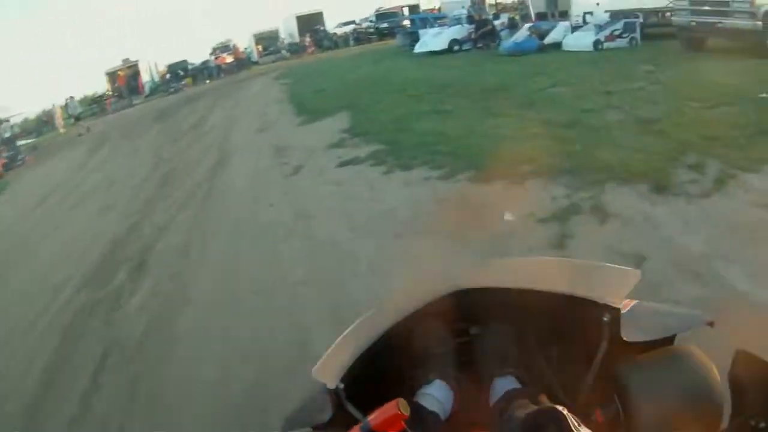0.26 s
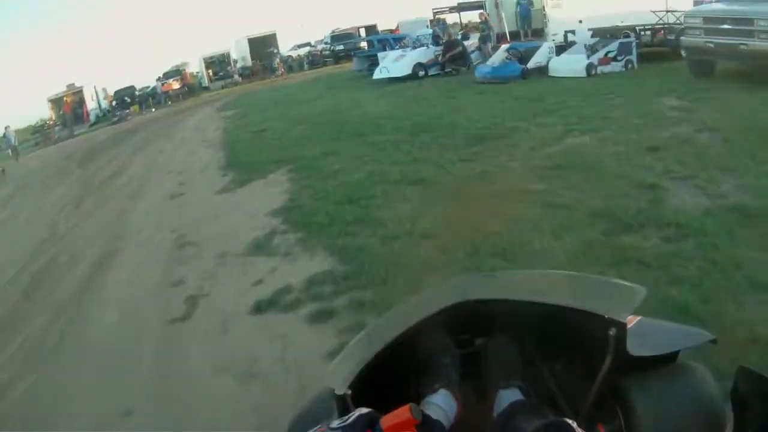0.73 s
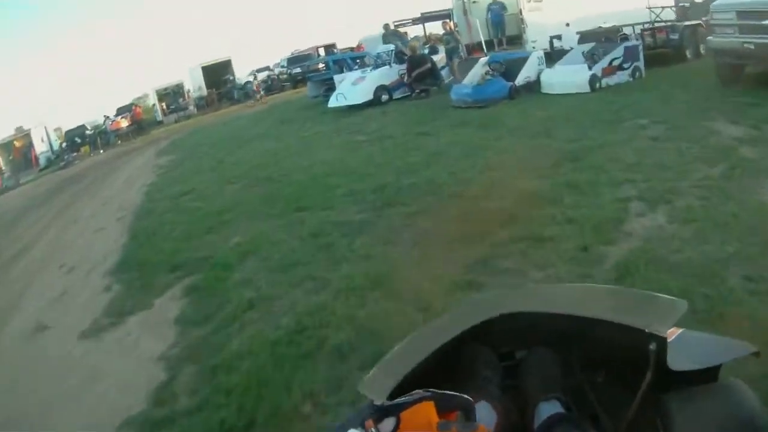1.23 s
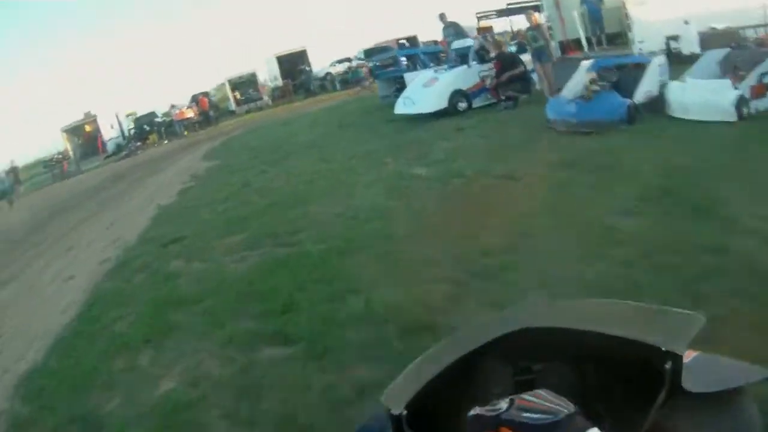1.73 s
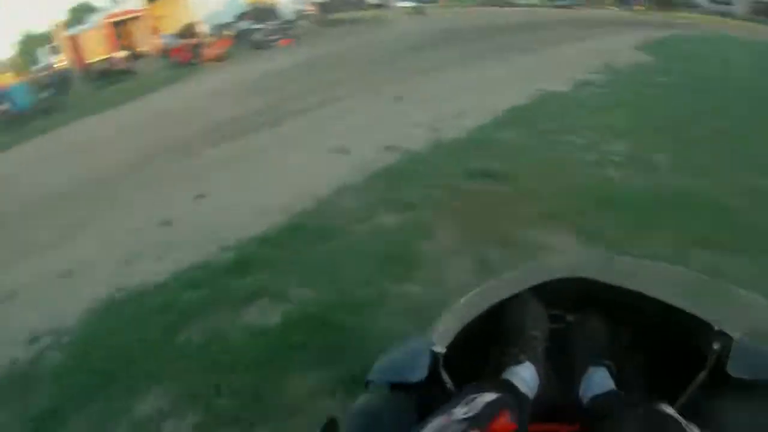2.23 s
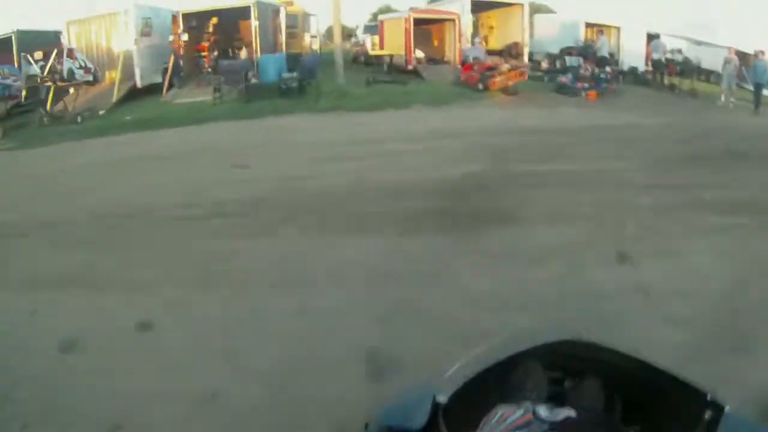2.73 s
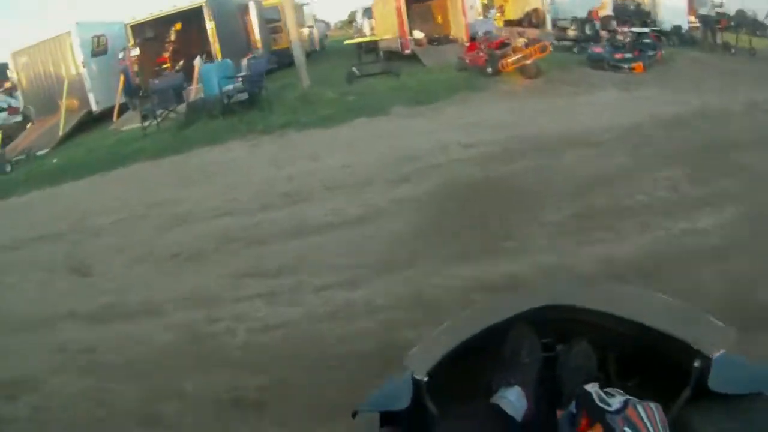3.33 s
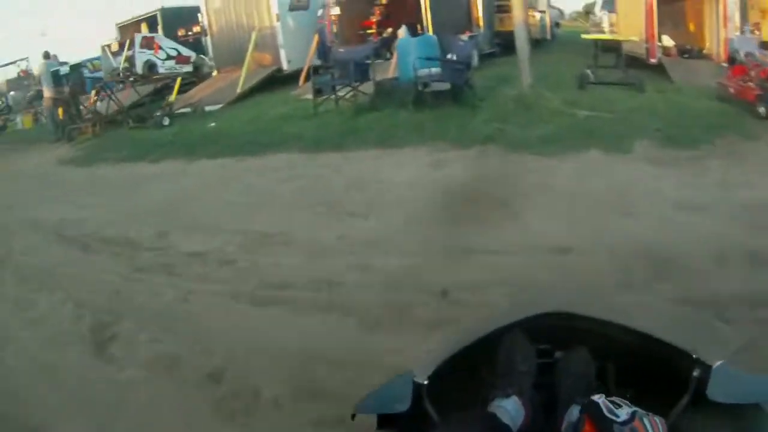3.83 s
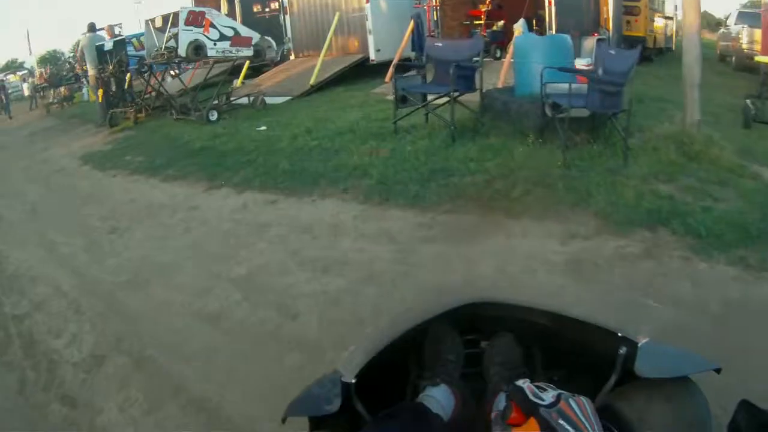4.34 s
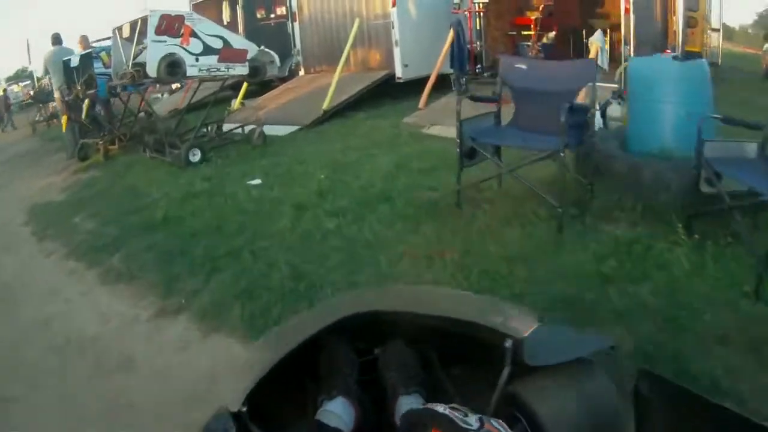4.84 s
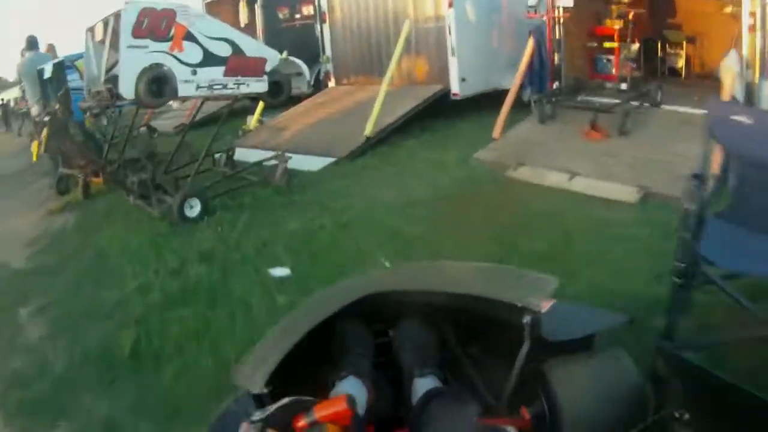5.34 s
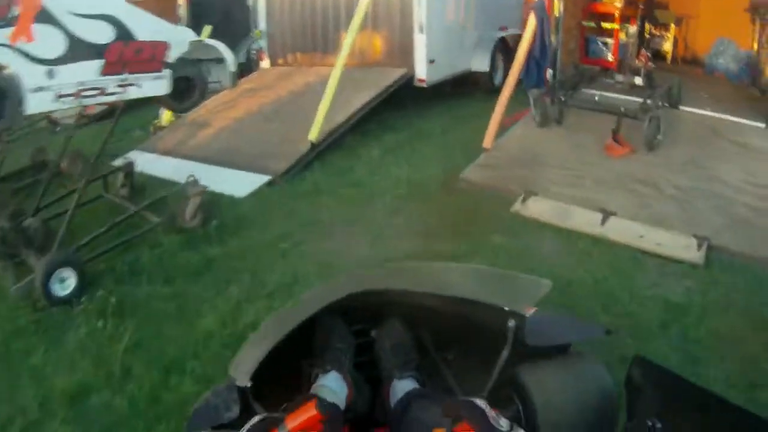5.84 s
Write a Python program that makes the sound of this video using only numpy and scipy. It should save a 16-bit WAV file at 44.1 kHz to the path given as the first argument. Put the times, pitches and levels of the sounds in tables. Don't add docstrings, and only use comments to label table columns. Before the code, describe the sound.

A small single-cylinder four-stroke kart engine, heard from the driver's helmet about a metre away, boxed in with a low hollow boom and a dry metallic rattle of chain and valve gear over faint tyre rumble. From 0 to 1.4 s it putters roughly at about 25 beats a second, soft puffs where charges misfire, sagging slightly near 1.2 s. At 1.4 s it swells into a loud, hard, blatting pull, held with tiny gaps until about 2.9 s. Then it coasts, slowing to separate puffs with weak pops; a small stone knock at 3.15 s. Around 3.55 s a blip climbs, peaking at 3.8 to 4 s, then falls into lumpy sputtering. A second, weaker blip comes at 5.0 to 5.2 s and dies away by 5.5 s. Slow dull knocks and rattling continue to the end at 6 s, with a tiny high brake chirp at 5.83 s.

```python
import sys
import numpy as np
from scipy import signal
from scipy.fft import rfft, irfft, next_fast_len
from scipy.io import wavfile
from scipy.ndimage import uniform_filter1d, map_coordinates

SR = 44100
rng = np.random.default_rng(int(sys.argv[2]) if len(sys.argv) > 2 else 0)


def invert_db(level):
    return 10 ** (np.asarray(level, dtype=float) / 20)


def unload_wav(signal):
    wavfile.write(
        sys.argv[1],
        SR,
        np.round(np.clip(np.atleast_2d(signal).T, -1, 1) * 32767).astype(np.int16),
    )


N = 268128

# pitch_hz, level_db (per Hz)
ROAD_RUMBLE = [(10, 1), (25, -15), (35, -2.5), (50, -25), (70, -18), (200, -29), (300, -33), (15000, -35)]
# start_s, level_db
FLOOR_KNOCKS = [
    (3.151, -28.5),
]
# start_s, length_s, from_hz, to_hz, level_db
BRAKE_SQUEAKS = [
    (5.83, 0.0048, 10200, 10900, -50),
    (5.835, 0.01, 10700, 11200, -45.5),
]
# time_s, speed_rpm
CRANK_SPEED = [(0.0, 3132.0), (0.888, 3000.0), (1.193, 2771.0), (1.431, 3516.0), (1.707, 3614.0),
               (2.692, 3590.0), (2.853, 3454.0), (2.94, 2777.0), (3.484, 1595.0), (3.601, 1985.0),
               (3.845, 3543.0), (3.991, 3285.0), (4.12, 2564.0), (4.603, 1804.0), (4.963, 1933.0),
               (5.095, 3001.0), (5.779, 1850.0), (6.08, 1828.0)]
# start_s, end_s, first_level_db, last_level_db
PULLS_UNDER_LOAD = [
    (.07, 1.14, -33.5, -34),
    (1.18, 1.38, -34, -34.5),
    (1.414, 1.55, -37.5, -21),
    (1.58, 2.09, -20.5, -24),
    (2.12, 2.78, -23, -22.5),
    (2.82, 2.883, -24.5, -27.5),
    (3.552, 3.67, -32.5, -28),
    (3.79, 3.97, -26.5, -28),
    (5.016, 5.18, -28.5, -32.5),
    (5.22, 5.51, -37.5, -42),
]
# time_s, level_db
LONE_BURNS = [(.265, -37), (.5, -32), (.85, -45), (1.02, -33), (1.27, -35), (2.98, -38.5), (3.07, -38),
              (3.12, -37.5), (3.17, -34.5), (3.34, -38.5), (3.41, -38), (3.71, -38), (3.75, -30),
              (4, -28.5), (4.09, -36.5), (4.13, -37.5), (4.18, -38.5), (4.23, -38.5), (4.28, -43),
              (4.39, -41), (4.51, -34.5), (4.7, -35.5), (4.83, -31), (5.36, -35.5), (5.62, -36.5),
              (5.8, -34.5), (6.06, -35.5)]
FAILED_CHARGES = [.19, .3, .46, .58, .78, .97, 1.06, 1.1, 1.34]
# pitch_hz, width_hz, level_db
FRAME_MODES = [(895, 160, -9), (1541, 33, 11), (1774, 120, 0.5), (2558, 59, 5), (3000, 23, -7),
               (3316, 55, 6), (3780, 92, 2.5), (4525, 226, 1), (5010, 300, 2), (6890, 150, -2),
               (8740, 180, -5), (9820, 310, -6.5)]
# pitch_hz, level_db (per Hz)
RATTLE_FLOOR = [(300, -57.5), (550, -6.5), (740, -11.5), (958, 5), (1150, 6.5), (1400, -8), (2390, -5),
                (4090, -17), (5300, -18), (6000, -47), (7000, -9), (10500, -29), (15200, -41), (15500, -55)]
# pitch_hz, width_hz, level_db
EXHAUST_MODES = [(884, 116, -2.5), (1013, 43, 0.5), (1517, 67, 0.5), (1793, 69, 3), (2000, 57, -1.5),
                 (2130, 104, -2), (2566, 77, 0), (2910, 59, -3), (3386, 193, -6), (4303, 100, -7),
                 (4854, 204, -9.5), (7090, 600, -14), (9050, 320, -21.5), (9900, 550, -25.5),
                 (11200, 780, -24.5)]
# pitch_hz, level_db (per Hz)
BLAST_FLOOR = [(200, -37), (500, -26), (750, -20), (924, -7), (1350, -9), (1680, -42), (2200, -14),
               (3070, -22.5), (4320, -11), (5200, -13.5), (6000, -38), (10600, -29), (15000, -25),
               (16000, -54)]
# pitch_hz, level_db
STROKE_PULSE = [(30, -11), (60, -22), (130, 9), (190, 5.5), (235, -43), (400, -41), (550, -13), (800, -42)]
# pitch_hz, level_db
BURN_PULSE = [(70, -10.5), (150, -17.5), (230, -32.5), (330, -8.5), (480, -10), (750, -21), (900, 12.5),
              (1000, 5.5), (1200, 6.5), (1400, -25), (1900, -24), (2400, -15), (3200, -48)]
# pitch_hz, width_hz, level_db
HEADER_MODES = [(460.5, 31, -0.5), (540, 7.3, 4), (644, 29, 1.5), (872, 21, -19), (900.6, 14.6, 15),
                (895, 32, 4.5), (1783, 160, 5)]
# pitch_hz, width_hz, level_db
MUFFLER_CHAMBERS = [(965, 130, -3), (1810, 150, 5), (2150, 220, 1), (1530, 120, -8)]


def unit(x):
    return x / np.sqrt(np.mean(x ** 2) + 1e-20)


def along(points, hz):
    f, v = np.transpose(points)
    return np.interp(np.log(hz + 1), np.log(f + 1), v)


def filtered(x, response):
    m = next_fast_len(N + SR // 2)
    hz = np.fft.rfftfreq(m + m % 2, 1 / SR)[:m // 2 + 1]
    return irfft(rfft(x, m) * response(hz), m)[..., :N]


def highpass(hz, order):
    return lambda f: 1 / (1 + (hz / (f + 1)) ** order)


def causal(gain):
    c = irfft(np.log(gain + 1e-6))
    c[1:len(c) // 2] *= 2
    c[len(c) // 2 + 1:] = 0
    return np.exp(rfft(c))


def resonator(f, hz, width_hz):
    return (1j * f * width_hz / (hz ** 2 - f * f + 1j * f * width_hz)) ** 2


def colour(peaks, spectrum, valley_db, low_hz):
    def response(f):
        ring = 0
        for hz, width, db in peaks:
            damping = (f * width) ** 2
            ring = ring + invert_db(db) ** 2 * damping / ((hz * hz - f * f) ** 2 + damping + 1)
        floor = invert_db(valley_db + along(spectrum, f)) ** 2
        return causal(np.sqrt(ring / (1 + (low_hz / (f + 1)) ** 8) + floor))
    return response


def exhaust_colour():
    air = colour(EXHAUST_MODES, BLAST_FLOOR, valley_db=-2, low_hz=815)
    gain = np.sqrt(np.mean(np.abs(air(np.fft.rfftfreq(8192, 1 / SR))) ** 2))
    return lambda f: air(f) / gain


def pulses(times, sizes):
    return np.bincount(np.clip((times * SR).astype(int), 0, N - 1), sizes, N)


def gust(u, rise, fall):
    return (1 - np.exp(-(u / rise) ** 2)) * np.exp(-(u / fall) ** 2.8)


def road():
    lumps = invert_db(1.5 * map_coordinates(rng.standard_normal(40), [np.arange(N) * 5 / SR]))
    return unit(lumps * filtered(rng.standard_normal(N), lambda f: invert_db(along(ROAD_RUMBLE, f))))


def floor_knock():
    t = np.arange(N) / SR
    knock = np.zeros(N)
    for start, db in FLOOR_KNOCKS:
        knock += invert_db(db) * gust(np.clip(t - start, 0, 1), rise=0.00027, fall=.005)
    return invert_db(1) * filtered(knock * rng.standard_normal(N), lambda f: resonator(f, 3500, 3000))


def brake_squeak():
    out = np.zeros(N)
    for start, length, from_hz, to_hz, db in BRAKE_SQUEAKS:
        u = np.linspace(0, 1, int(length * SR))
        phase = 2 * np.pi * length * (from_hz * u + (to_hz - from_hz) * u * u / 2)
        out[int(start * SR):][:len(u)] += invert_db(db) * np.sin(np.pi * u) ** .5 * np.sin(phase)
    return out


def cycles():
    s, rpm = np.transpose(CRANK_SPEED)
    t = np.arange(N) / SR
    done = .13 + np.cumsum(np.interp(t, s, rpm)) / (120 * SR)
    loudest = np.interp(np.arange(int(done[-1]) + 2), done, t)
    burn_db = np.full(len(loudest), -120.)
    scatter = rng.standard_normal(len(loudest))
    for start, end, first_db, last_db in PULLS_UNDER_LOAD:
        on = (loudest > start - .018) & (loudest < end + .018)
        burn_db[on] = np.interp(loudest[on], [start, end], [first_db, last_db]) + 0.5 * scatter[on]
    for s, db in LONE_BURNS + [(s, -120) for s in FAILED_CHARGES]:
        burn_db[np.argmin(np.abs(loudest - s))] = db
    done = done + .215
    return done, np.interp(np.arange(len(loudest)), done, t), burn_db


def levels(times, burn_db):
    idle_rpm, cold_db, warm_db = 3005, -35, -34.5
    octaves = np.log2(np.interp(times, *np.transpose(CRANK_SPEED)) / idle_rpm)
    heat = np.clip((burn_db - cold_db) / (warm_db - cold_db), 0, 1)
    heat = np.maximum(heat, 0.3 * np.roll(heat, 1))
    puff_db = -45 + 5.9 * octaves + 5.3 * heat
    rattle_db = -47 + 8.1 * octaves + 1.39 * heat
    boom_db = -52.5 + 8.1 * octaves + 5.47 * heat
    bright_db = 4.5 * octaves - 1.5 * np.clip(times - 5.9, 0, None)
    return puff_db, rattle_db, boom_db, bright_db


def running_gear(angle, seat_db, rattle_db, bright_db):
    ticks = invert_db(1.52 * unit(uniform_filter1d(rng.standard_normal(N), size=90)))
    seats = 1 + .6 * invert_db(seat_db) * gust((angle - .62) % 1, rise=.04, fall=.14)
    clatter = rng.standard_normal(N + 512) * np.pad(ticks * seats, (0, 512))
    z = signal.stft(clatter, nperseg=512)[2]
    patches = uniform_filter1d(rng.standard_normal(z.shape), size=8, axis=0)
    patches = uniform_filter1d(patches, size=10, axis=1)
    loose = signal.istft(z * invert_db(1.08 * unit(patches)), nperseg=512)[1][:N]
    gear = unit(filtered(loose, colour(FRAME_MODES, RATTLE_FLOOR, valley_db=2, low_hz=840)))
    top = filtered(gear, highpass(9600, 6))
    return invert_db(rattle_db + 2) * (gear + top * (invert_db(bright_db) - 1))


def housing_boom(times, burn_db, boom_db, kick_db):
    kicks = pulses(times, invert_db(boom_db + 57 + kick_db) * (.5 + .5 * (burn_db > -60)))
    return filtered(kicks, lambda f: resonator(f, 187, 21))


def stroke_pump(arrival, breath):
    return filtered(pulses(arrival, breath ** 0.22 * invert_db(-8.5)), lambda f: causal(invert_db(along(STROKE_PULSE, f))))


def puffs(air, stroke, angle, breath, burn_db):
    flow = (breath * np.where(burn_db > -60, .6, 1))[stroke] * gust(angle, rise=0.093, fall=0.54)
    dull = lambda f: air(f) / (1 + (f / 8000) ** 4) ** .5
    return invert_db(2.5) * filtered(rng.standard_normal(N) * flow, dull)


def burn_pressure(arrival, rate, burn_db, boom_db, chance_db):
    size = invert_db(.5 * burn_db + .5 * boom_db + 32.5 + 1.04 * chance_db) * np.clip((burn_db + 50) / 11, 0, 1)
    push = filtered(pulses(arrival, size), colour(HEADER_MODES, BURN_PULSE, valley_db=-2.0, low_hz=425))
    echo = filtered(push, lambda f: 0.8 * np.exp(-2j * np.pi * f * 0.0144) / (1 + (f / 600) ** 4))
    chambers = lambda f: sum(invert_db(db) * resonator(f, hz, width) for hz, width, db in MUFFLER_CHAMBERS)
    lag_s = .0011 * (30 / rate) ** 3
    bark = filtered(pulses(arrival + lag_s, invert_db(burn_db + 33 + 1.1 * chance_db)), chambers)
    return push + echo + bark


def jet_hiss(air, blast, angle, burn):
    jet = unit(filtered(rng.standard_normal(N), lambda f: air(f) / (1 + (3000 / (f + 1)) ** 4) ** .5))
    flow = gust(blast, rise=0.11, fall=0.22) + invert_db(-15.0) * gust(blast, rise=0.14, fall=0.81)
    fizz = unit(filtered(rng.standard_normal(N), lambda f: air(f) * highpass(9500, 8)(f)))
    load = uniform_filter1d(burn, size=1500) * (1 + 0.29 * np.cos(4 * np.pi * angle))
    return invert_db(-6) * burn * flow * jet + invert_db(-37.0) * load * fizz


def bangs(air, stroke, blast, burn, rate, arrival):
    since_arrival = np.arange(N) - (arrival * SR).astype(int)[stroke]
    habit = rng.standard_normal(SR // 5)[since_arrival]
    habit = filtered(habit, highpass(1300, 8))
    lumps = invert_db(2.2 * unit(uniform_filter1d(rng.standard_normal(N), size=24)))
    crackle = unit((0.45 * rng.standard_normal(N) + 0.62 * habit) * lumps)
    burst = gust(blast, rise=1.2 / rate[stroke], fall=.19)
    tail = invert_db(-12) * gust(blast, rise=.15, fall=.6)
    blow = crackle * burn * (burst + tail)
    slow = np.clip((27 - rate[stroke]) / 20, 0, .7)
    sharp = filtered(blow * (1 - slow), lambda f: air(f) / (1 + (f / 3300) ** 4) ** .5)
    dull = filtered(blow * slow, lambda f: air(f) / (1 + 1j * f / 1400) ** 2)
    return invert_db(-2.2) * (sharp + dull)


def engine():
    done, times, burn_db = cycles()
    stroke, angle = done.astype(int), done % 1
    puff_db, rattle_db, boom_db, bright_db = levels(times, burn_db)
    chance = rng.standard_normal((len(times), 3))
    air = exhaust_colour()
    burn = invert_db(burn_db)[stroke]
    breath = invert_db(puff_db + 1.6 * chance[:, 0])
    rate = 1 / np.clip(np.gradient(times), .03, .08)
    late = 0.004256 * (rate - 12)
    blast = np.clip(angle - late[stroke], 0, 1)
    arrival = times + late / rate
    wander = arrival + .00009 * chance[:, 1]
    t = np.arange(N) / SR
    rattle_db, bright_db = np.interp(t, times, rattle_db), np.interp(t, times, bright_db)

    mix = invert_db(0.27 * rattle_db - 44.5) * road()
    mix = mix + running_gear(angle, 3 * chance[stroke, 2], rattle_db, bright_db)
    mix = mix + housing_boom(times, burn_db, boom_db, chance[:, 0])
    mix = mix + stroke_pump(wander, breath)
    mix = mix + puffs(air, stroke, angle, breath, burn_db)
    mix = mix + burn_pressure(wander, rate, burn_db, boom_db, chance[:, 2])
    mix = mix + jet_hiss(air, blast, angle, burn)
    return mix + bangs(air, stroke, blast, burn, rate, arrival)


def scene():
    mono = floor_knock() + brake_squeak() + engine()
    return np.array([mono, mono])


def top_cut(x):
    return signal.sosfilt(signal.butter(12, 16360, fs=SR, output="sos"), x)


def record(dry):
    def inputs(f):
        left, right = 1 + 0 * f, 1j * f / (130 + 1j * f)
        return np.array([left, right]) * (f < 15850) / (1 + (f / 15330) ** 200)
    return top_cut(filtered(dry, inputs))


dry = scene()
out = record(dry)
unload_wav(out)
```